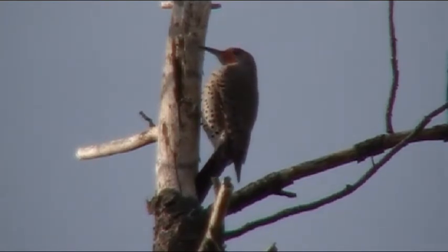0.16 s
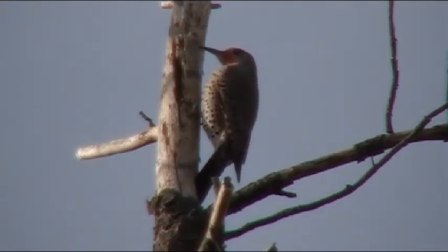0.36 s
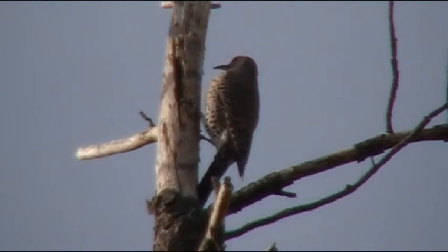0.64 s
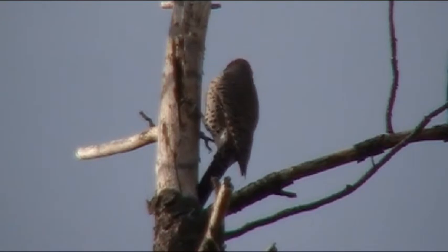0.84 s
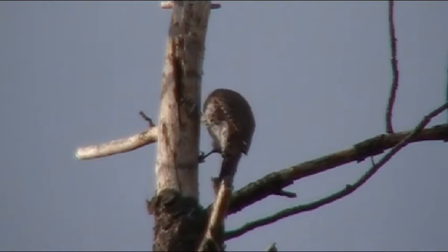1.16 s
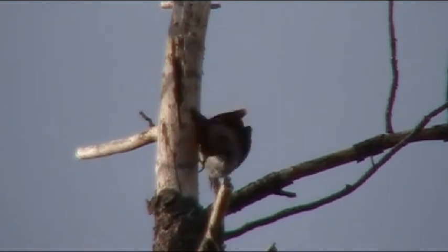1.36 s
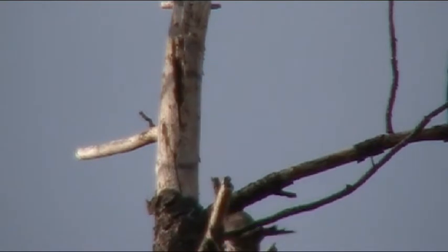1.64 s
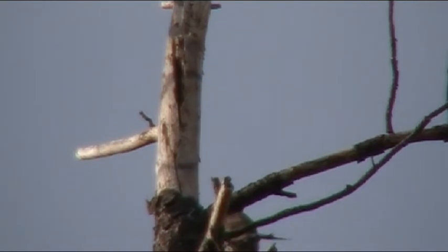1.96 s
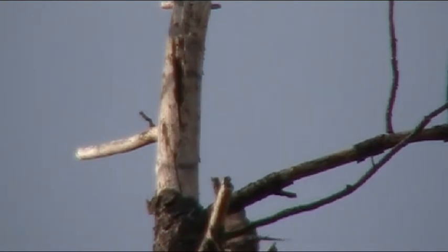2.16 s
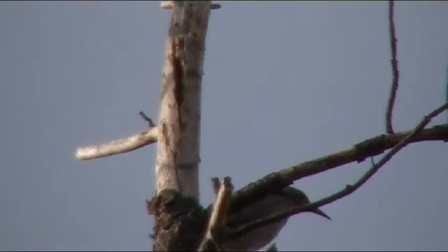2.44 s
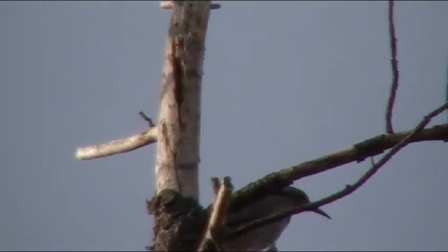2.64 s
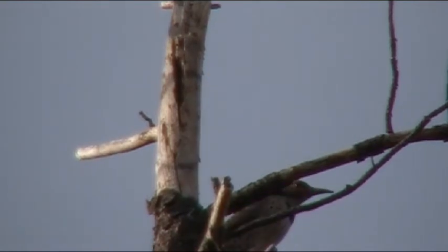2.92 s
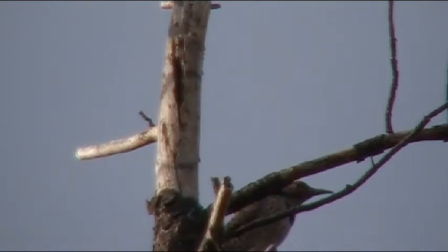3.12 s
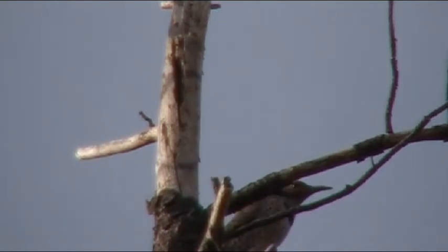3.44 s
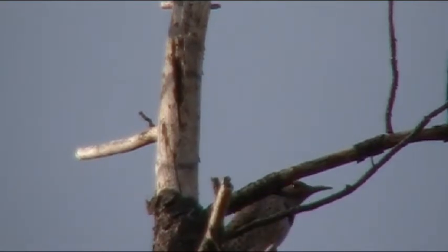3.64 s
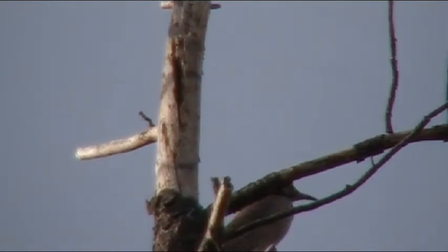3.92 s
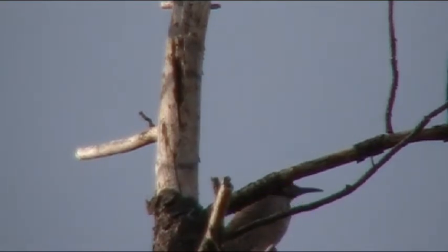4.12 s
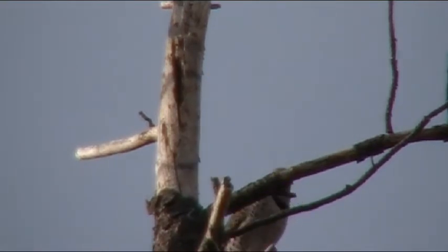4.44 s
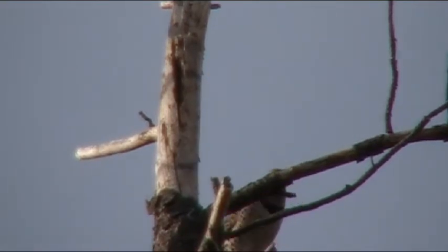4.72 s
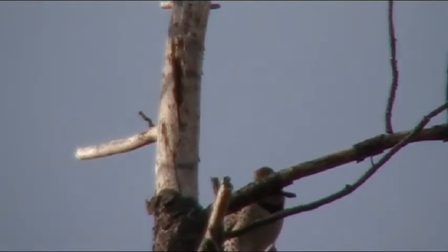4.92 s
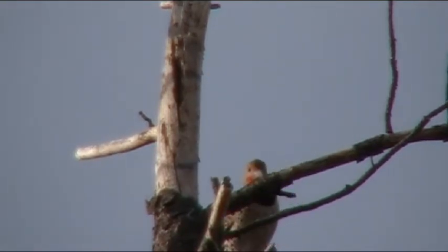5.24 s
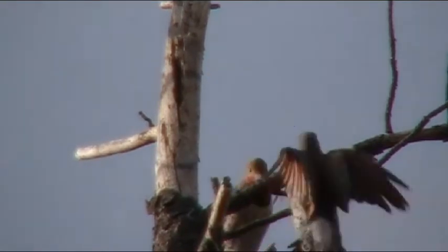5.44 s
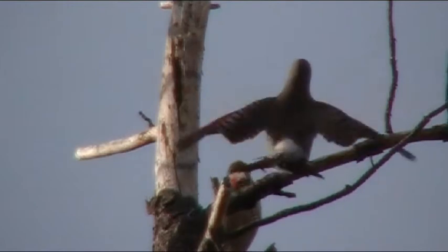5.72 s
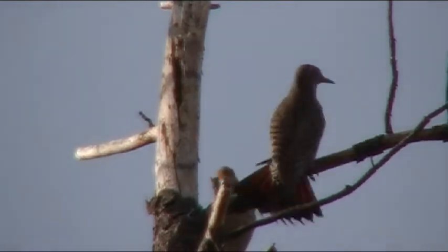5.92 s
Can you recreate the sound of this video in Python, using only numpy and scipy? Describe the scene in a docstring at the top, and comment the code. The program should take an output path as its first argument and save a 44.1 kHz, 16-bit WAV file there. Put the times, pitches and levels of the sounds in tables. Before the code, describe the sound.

A faint, steady outdoor hiss runs throughout. At about 0.9 seconds a woodpecker gives a soft, short falling note, then begins a series of wick-a calls, roughly one every 0.6 seconds. Each is a reedy, slightly quavering upward slide, usually snapping into a tiny high whistle, followed by a brief falling note. The slides peak near 1.4, 2.0 and 2.5 seconds, growing stronger up to the loudest, raspiest one at 3.1 seconds. They ease off at 3.7 and 4.3 seconds, turn softer at 4.9 and 5.6, and end with a barely audible slide around 6 seconds. From about 4 to 5.9 seconds a second woodpecker answers between the calls with four very soft, thin rising whines. Tiny dry claw ticks on bark come near 1.4 and 5.8 seconds. The surrounding trees add a light, short echo to the calls.

```python
"""Two woodpeckers calling

Two woodpeckers meet on a dead tree and trade a "wick-a, wick-a" call, made in the syrinx (voice box).
Each "wick" is a reedy upward slide that usually breaks into a whistle; a short falling "a" follows.
The second bird answers with soft whines. Claws tick, and trunks echo it all over a steady hiss."""
import sys
import numpy as np
from scipy import signal
from scipy.fft import rfft, irfft, next_fast_len
from scipy.io import wavfile
from scipy.ndimage import map_coordinates

SR = 44100
rng = np.random.default_rng(int(sys.argv[2]) if len(sys.argv) > 2 else 0)


def generate_wav(signal):
    """Clip the signal to [-1, 1] and save it as 16-bit WAV at the path in sys.argv[1]."""
    frames = np.transpose(np.atleast_2d(signal))
    scaled = np.clip(frames, -1, 1) * 32767
    pcm = np.round(scaled).astype(np.int16)
    wavfile.write(sys.argv[1], SR, pcm)


N = 268083


def amp(db):
    """Turn decibels into a gain."""
    return 10 ** (np.asarray(db) / 20)


def unit(x):
    """Scale a sound to an average (rms) level of 1."""
    return x / np.sqrt(np.mean(x ** 2) + 1e-20)


def along(points, hz):
    """Read a curve of (frequency, value) points on a log frequency axis."""
    freqs, values = np.transpose(points)
    return np.interp(np.log(hz + 1), np.log(freqs + 1), values)


def wobble(n, rate):
    """A smooth random curve of n samples, with `rate` new values a second."""
    return map_coordinates(rng.standard_normal(n // 8 + 8), [np.arange(n) * rate / SR], mode="wrap")


def filtered(x, response):
    """Turn each frequency up or down by the gain response(hz)."""
    n = x.shape[-1]
    padded = next_fast_len(n + 8192)
    return irfft(rfft(x, padded) * response(np.fft.rfftfreq(padded, 1 / SR)), padded)[..., :n]


def add(track, time, sound):
    """Mix a sound into the track at a time in seconds."""
    part = track[max(round(time * SR), 0):][:len(sound)]
    part += sound[:len(part)]


# Tone of the background: (frequency [Hz], relative level [dB])
HISS_TONE = [(15, -57), (25, -37), (129, -17), (240, -7), (274, -6.5), (359, -5), (510, -2), (723, -2),
             (1620, -2.5), (2700, -5), (4050, -7), (8160, -10), (15600, -15.5)]
def outdoor_hiss(level_db=-60.5):
    """Distant rustle and hiss blend into one steady noise."""
    noise = rng.standard_normal(N)
    return amp(level_db) * unit(filtered(noise, lambda hz: amp(along(HISS_TONE, hz))))


def harmonics(pitch, throat, jitter, flutter_db, beak=1):
    """An unsteady syrinx makes harmonics (multiples of its pitch); throat and beak set their strengths."""
    n = len(pitch)
    pitch = pitch * (1 + jitter * (0.68 * wobble(n, 1100) + 0.87 * wobble(n, 170)))
    multiples = np.arange(1, 21)[:, None]
    hz = multiples * pitch
    lookup_hz = np.where(hz < 5000, hz / beak, hz)  # a beak ratio under 1 lowers the resonances
    strength = amp(along(throat, lookup_hz)) * (hz < SR / 2)
    flutter = amp(flutter_db * np.array([wobble(n, 155.7) for _ in multiples]))
    cycles = np.cumsum(hz, axis=1) / SR + rng.random(multiples.shape) / 2
    return hz, strength, np.sqrt(2) * flutter * np.sin(2 * np.pi * cycles)


# How the caller's throat and beak color its voice: (frequency [Hz], gain [dB])
CALLER_THROAT = [(1500, 4.5), (1800, -4), (2350, -1), (2780, -1.5), (3500, 1), (4400, -6.5), (5400, -14.5),
                 (6400, -16.5), (7400, -28), (8800, -21.5), (10000, -17.5), (11500, -25), (14300, -30),
                 (16000, -37)]
def reedy_voice(pitch, base_db, treble_db, jitter, beak, second_db):
    """The caller's voice: a base tone (the first harmonic), a throaty middle and a raspy treble."""
    hz, strength, waves = harmonics(pitch, CALLER_THROAT, jitter, flutter_db=2.56, beak=beak)
    strength[1] *= amp(second_db)
    treble_share = np.clip((hz[1:] - 4600) / 600, 0, 1)

    def blend(gains):
        return (gains * waves[1:]).sum(0) / np.sqrt((gains ** 2).sum(0) + 1e-12)

    middle = blend(strength[1:] * (1 - treble_share))
    treble = blend(strength[1:] * treble_share)
    base_gain = np.minimum(amp(base_db), .9)
    body = base_gain * waves[0] + np.sqrt(1 - base_gain ** 2) * middle
    # swirling air puffs through the syrinx once a cycle, brighter than the tone
    puffs = rng.standard_normal(len(pitch)) * (1 + waves[0] / 2)
    rasp = unit(filtered(puffs, lambda f: amp(along(CALLER_THROAT, f)) * f))
    return body + amp(treble_db) * (.95 * treble + .42 * rasp)


# The "a" notes: (time [s], pitch to fall from [Hz], pitch to fall to [Hz], level [dB],
# base tone share [dB], treble share [dB], length [s])
FALLING_NOTES = [(0.936, 927, 853, -55.5, -5, -24, 0.061), (1.597, 1056, 836, -52, -3, -27, .05),
                 (2.164, 1051, 904, -45, -3, -14.5, 0.054), (2.706, 1057, 788, -37.5, -7, -14, 0.15),
                 (3.26, 1008, 788, -38, -9.5, -12, 0.035), (3.891, 983, 753, -43.5, -9, -17.5, 0.078),
                 (4.522, 933, 748, -48, -7, -16, 0.069), (5.199, 890, 720, -57, -5.5, -14, .05),
                 (5.755, 1077, 682, -54, -4, -18, .05)]
def falling_notes(sag_hz_per_s=700, linger_db=-18, fade_s=0.021):
    """A sudden "a" whose pitch and strength sink as the syrinx relaxes, then linger softly."""
    out = np.zeros(N)
    for time, from_hz, to_hz, db, base_db, treble_db, length in FALLING_NOTES:
        t = np.arange(int(length * SR)) / SR
        fall_hz = to_hz + (from_hz - to_hz) * np.exp(-t / 0.012)
        flick_hz = 500 * np.exp(-t / 0.00189)  # the note starts extra high for an instant
        pitch = fall_hz + flick_hz - sag_hz_per_s * t
        attack = np.minimum(t / 0.0069, 1)
        decay = amp(-10 * (t / 0.021) ** 1.12)
        linger = amp(linger_db) * np.minimum((length - t) / fade_s, 1)
        voice = reedy_voice(pitch, base_db, treble_db, jitter=0.0225, beak=0.78, second_db=-2)
        add(out, time, amp(db) * attack * np.maximum(decay, linger) * voice)
    return out


# Echoes from close branches and from farther trunks: (frequency [Hz], time to fade by 60 dB [s])
BRANCH_ECHO = [(500, 0.058), (3000, 0.075), (14000, 0.066)]
TRUNK_ECHO = [(1800, 0.6), (2950, 0.62), (4200, 0.26), (14000, 0.34)]
def echo(sound, fade_times, delay_s):
    """Trees scatter the sound into a blur in which each frequency dies at its own speed."""
    hz, t, noise = signal.stft(rng.standard_normal(SR), SR, nperseg=256)
    fade = amp(-60 * t / along(fade_times, hz)[:, None])
    tail = signal.istft(noise * fade, SR, nperseg=256)[1]
    tail = np.pad(tail / np.linalg.norm(tail), (int(delay_s * SR), 0))
    return signal.fftconvolve(sound, tail)[:N]


def slide(length, from_hz, climb_hz, top_hz, whip_s, attack_s=.018, release_s=0.0027):
    """The pitch climbs steadily, then shoots to the top (the "whip"); the note eases in and stops short."""
    t = np.arange(int((length + release_s) * SR)) / SR
    progress = np.minimum(t / length, 1)
    whip = np.exp((progress - 1) * length / whip_s)  # near 0 for most of the note, 1 at its end
    pitch = from_hz + (climb_hz - from_hz) * progress + (top_hz - climb_hz) * whip
    fades = (1 - np.exp(-t / attack_s)) * np.clip((t[-1] - t) / release_s, 0, 1)
    return progress, whip, pitch, fades


# The "wick" slides: (end time [s], length [s], starting pitch [Hz], goal of the slow climb [Hz],
# top pitch [Hz], whip time [s], quaver depth [share of pitch], quaver rate [Hz],
# level after the climb [dB], swell [dB], extra push in the whip [dB], base tone share [dB],
# second harmonic boost [dB], treble share [dB], beak resonance at the start [ratio],
# beak resonance at the end [ratio], hoarseness [0-1])
WICKS = [(1.384, 0.18, 874, 931, 1460, .013, .012, 8.6, -54.5, 7, 1, -4, 4, -18, 0.89, 0.91, .15),
         (1.979, 0.22, 811, 1037, 1337, 0.029, 0.015, 13.8, -47.5, 12.5, 0, -5, 2, -17.5, 0.84, 1.13, 0.4),
         (2.523, .19, 800, 931.6, 1476, .01, 0.0027, 13, -41.5, 18, 1, -7, 0, -13, 0.9, 1.03, 0.3),
         (3.083, 0.25, 727, 949, 1400, 0.028, 0.026, 22.5, -33.5, 21.5, -3, -10, -1, -9, 0.94, 1.05, 0.25),
         (3.677, .21, 725.6, 854, 1478, 0.013, 0.011, 14.3, -45, 10.5, 8.5, -10.5, 1.5, -12.5, 0.99, .94, 0.15),
         (4.317, 0.2, 765, 839, 1405, 0.011, .01, 25.5, -45.5, 9.5, 5, -12.5, 1, -18.5, .92, 0.93, 0),
         (4.928, .095, 731, 884, 1406, .008, 0.0089, 23, -56, 5, 8.5, -7, 3.5, -14.5, 0.83, .8, .1),
         (5.569, 0.18, 689, 818, 1300, 0.015, 0.02, 14.3, -50.5, 13.5, 0.5, -10, -0.5, -22, 0.75, 0.77, .1),
         (6.14, .21, 705, 778, 1350, .012, 0.013, 13, -65, 2.5, 3, -8.5, -1, -27, 0.66, .72, .1)]
def wicks(quaver_swell_db=50, flap_ratio=.34):
    """The caller's quavering pitch climbs ever faster as its voice swells, brightens and turns hoarse."""
    out = np.zeros(N)
    for (end, length, from_hz, climb_hz, top_hz, whip_s, quaver, quaver_hz, db, swell_db, push_db,
         base_db, second_db, treble_db, beak_from, beak_to, hoarseness) in WICKS:
        progress, whip, pitch, fades = slide(length, from_hz, climb_hz, top_hz, whip_s)
        remaining, past_middle = 1 - progress, progress - .5
        sway = quaver * np.cos(2 * np.pi * quaver_hz * length * remaining)
        pitch = pitch * (1 + sway)
        strain = np.clip((pitch - 830) / 350, 0, 1)
        voice = reedy_voice(pitch, second_db=second_db,
                            base_db=base_db - 5 * past_middle + 3.5 * whip,  # thins, returns in the whip
                            treble_db=treble_db + 2 * past_middle,
                            jitter=0.0084 + .018 * strain,
                            beak=beak_from + (beak_to - beak_from) * progress)
        # a hoarse syrinx also flaps at about a third of its pitch
        flap_hz = flap_ratio * pitch * (1 + 0.153 * wobble(len(pitch), 199.5))
        flap = 1 + hoarseness * strain * np.sin(2 * np.pi * np.cumsum(flap_hz) / SR)
        climb_db = db - swell_db * remaining ** 1.18  # grows fast at first, then levels off
        level_db = climb_db + push_db * whip + quaver_swell_db * sway
        add(out, end - length, fades * amp(level_db) * flap * voice)
    return out


# Whistles that end the slides: (time [s], length [s], top pitch [Hz], end pitch [Hz], peak level [dB],
# second harmonic share [dB])
WHISTLE_NOTES = [(1.381, 0.028, 3040, 2890, -50, -34), (1.981, 0.039, 3128, 3000, -42, -20.5),
                 (2.526, 0.013, 3150, 2974, -30, -22), (3.088, 0.016, 2834, 2748, -26.5, -13),
                 (3.676, 0.015, 2804, 2620, -36, -15), (4.318, 0.012, 2720, 2575, -35.5, -19.5),
                 (4.928, 0.017, 2570, 2410, -44, -32), (5.571, 0.02, 2470, 2430, -49, -36)]
def whistles():
    """The voice breaks and jumps about an octave to a nearly pure, sagging tone."""
    out = np.zeros(N)
    for time, length, top_hz, end_hz, db, second_db in WHISTLE_NOTES:
        progress = np.linspace(0, 1, int(length * SR))
        pitch = top_hz + (end_hz - top_hz) * progress ** 2
        pitch *= 1 + 0.0018 * wobble(len(pitch), 500)
        phase = 2 * np.pi * np.cumsum(pitch) / SR
        overtones = sum(amp(second_db - 6.3 * i) * np.sin((i + 2) * phase) for i in range(4))
        swell = np.interp(progress, [0, .25, .6, .92, 1], [0.055, 1, 0.63, 0.72, 0.16])
        add(out, time, np.sqrt(2) * amp(db) * swell * (np.sin(phase) + overtones))
    return out


# Claws touching the bark: (time [s], relative level [dB])
CLAW_TICKS = [(1.435, -43.5), (5.819, -43.5)]
# How the bark colors each tick: (frequency [Hz], gain [dB])
BARK_TONE = [(500, -20), (2500, -8), (5000, -15), (10000, -2), (16000, -28)]
def claw_ticks(fade_s=0.007):
    """Claws make tiny dry ticks as the birds shift their grip."""
    out = np.zeros(N)
    t = np.arange(SR // 50) / SR
    for time, db in CLAW_TICKS:
        add(out, time, amp(db + 6 - 60 * t / fade_s) * rng.standard_normal(len(t)))
    return filtered(out, lambda hz: amp(along(BARK_TONE, hz)))


# How the second bird's throat and beak color its voice: (frequency [Hz], gain [dB])
PARTNER_THROAT = [(850, 2), (1250, -6), (1700, -9), (2100, -4), (2650, 1.5), (3400, -13), (5000, -19),
                  (9000, -48)]
# Its answers: (end time [s], length [s], starting pitch [Hz], goal of the slow climb [Hz],
# top pitch [Hz], whip time [s], level halfway [dB], swell [dB], extra push in the whip [dB])
SOFT_WHINES = [(4.19, .18, 790, 896, 925, 0.011, -68, 4, 1),
               (4.72, 0.21, 798, 934, 1400, .015, -61.5, 5, 6.5),
               (5.258, .235, 796.4, 908, 1350, .013, -62.5, 5, 3.5),
               (5.856, 0.21, 750, 916, 1340, .012, -63.5, -1, 6)]
def whines():
    """The second bird's syrinx makes thin upward slides, mostly first and third harmonic."""
    out = np.zeros(N)
    for end, length, from_hz, climb_hz, top_hz, whip_s, db, swell_db, push_db in SOFT_WHINES:
        progress, whip, pitch, fades = slide(length, from_hz, climb_hz, top_hz, whip_s)
        _, strength, waves = harmonics(pitch, PARTNER_THROAT, jitter=0.01, flutter_db=2.0)
        voice = (strength * waves).sum(0) / np.linalg.norm(strength, axis=0)
        level_db = db + swell_db * (progress - 0.5) + push_db * whip
        add(out, end - length, fades * amp(level_db) * voice)
    return out


def scene():
    """Both birds among close branches and farther trunks, the same in the left and right channels."""
    birds = wicks() + whistles() + falling_notes() + whines() + claw_ticks()
    branches = amp(-8.5) * echo(birds, BRANCH_ECHO, delay_s=.005)
    trunks = amp(-16.5) * echo(birds, TRUNK_ECHO, delay_s=.025)
    heard = birds + branches + trunks + outdoor_hiss()
    return np.array([heard, heard])


def record(dry):
    """Cut away the very highest treble."""
    return filtered(dry, lambda hz: hz < 15720)


dry = scene()
out = record(dry)
generate_wav(out)
```